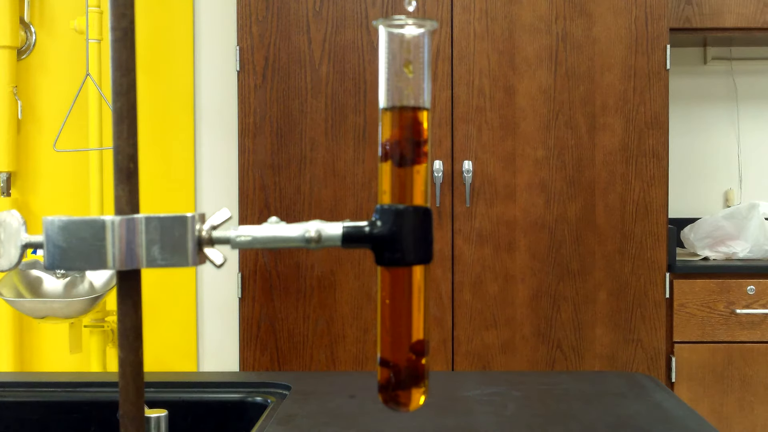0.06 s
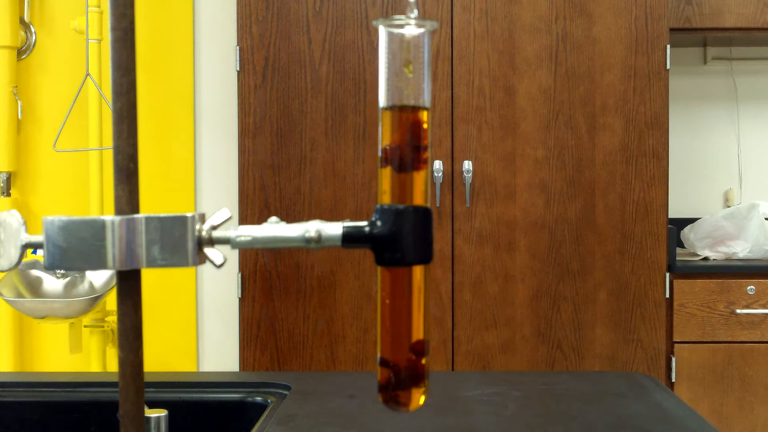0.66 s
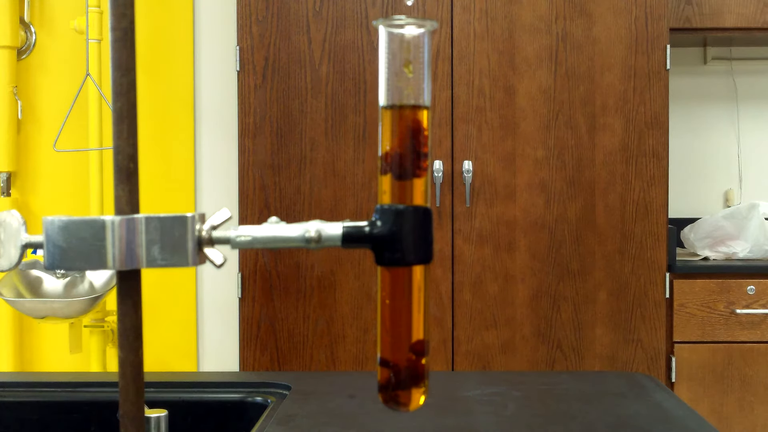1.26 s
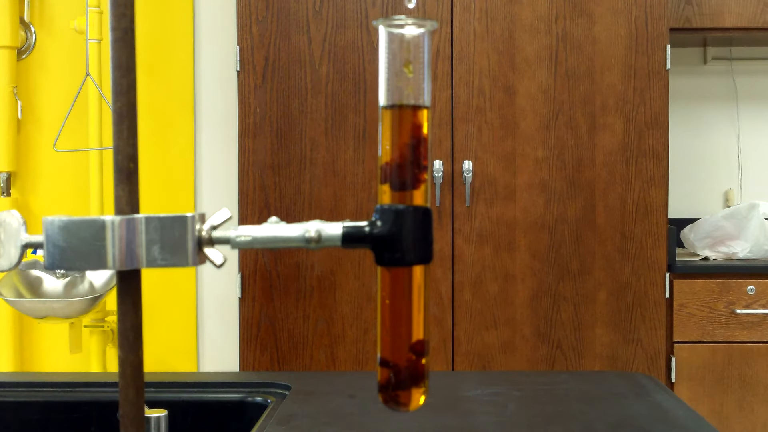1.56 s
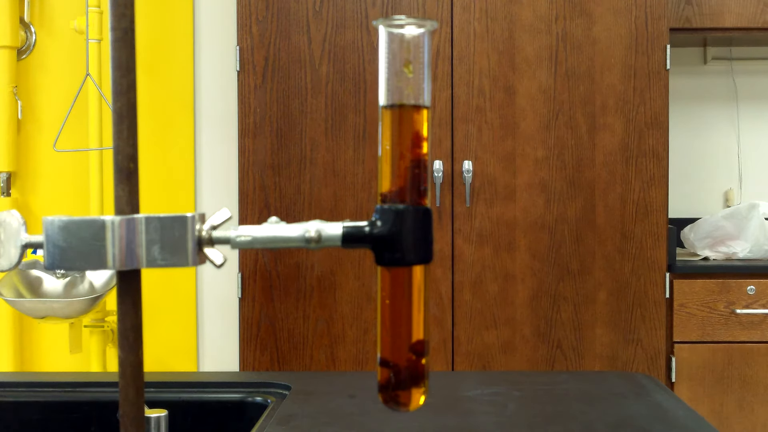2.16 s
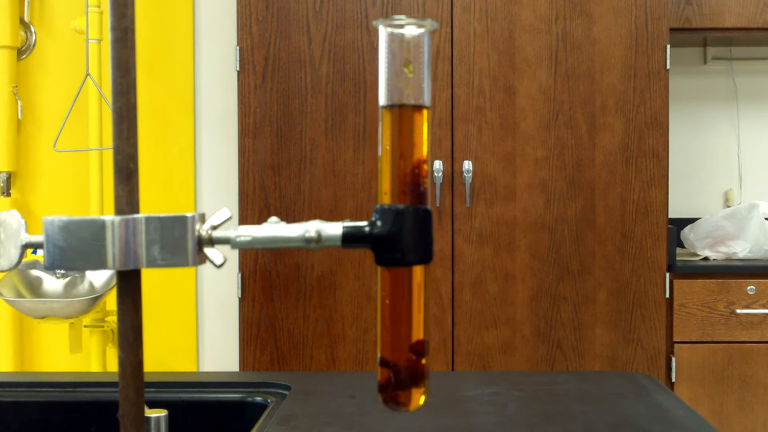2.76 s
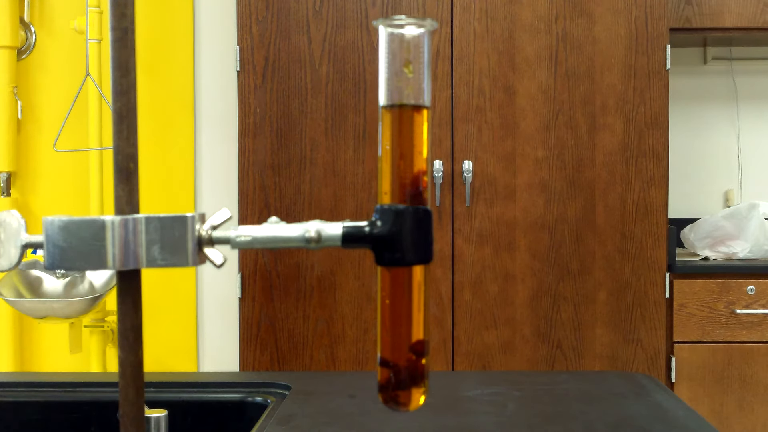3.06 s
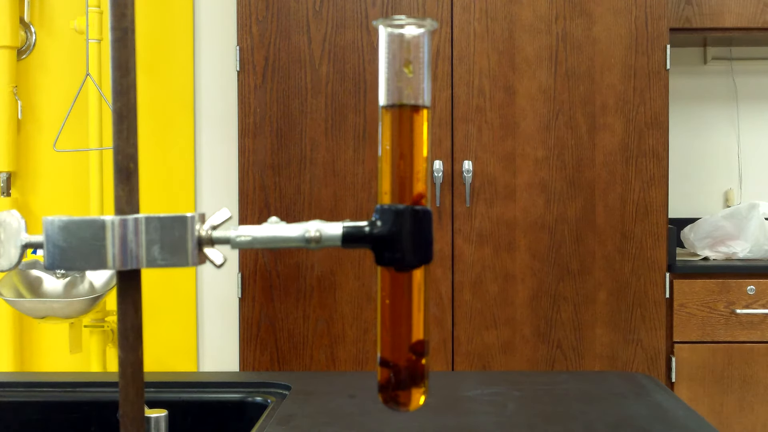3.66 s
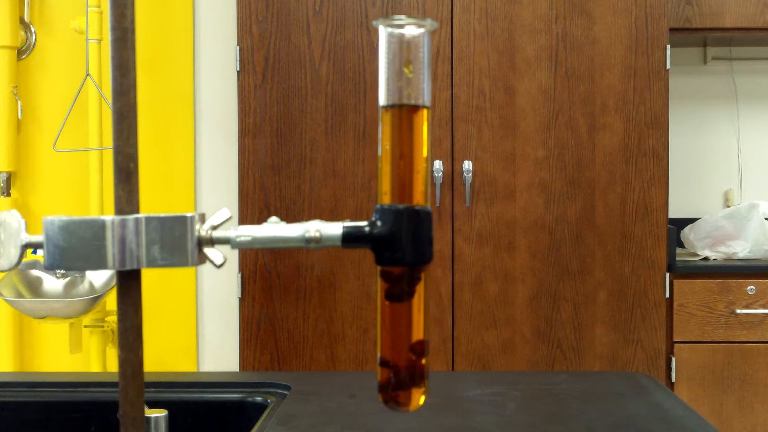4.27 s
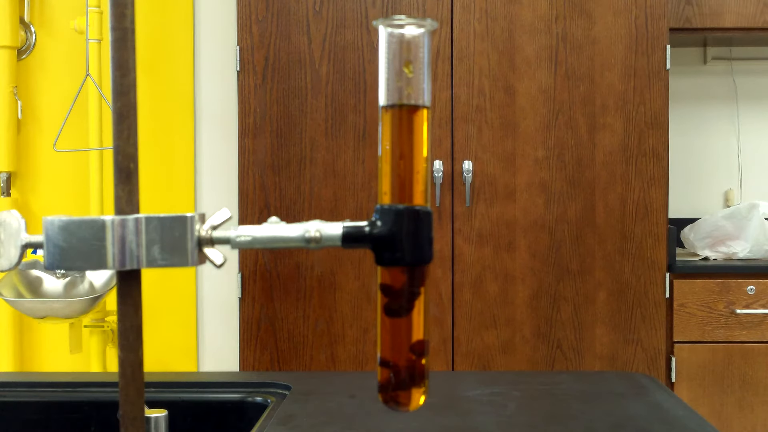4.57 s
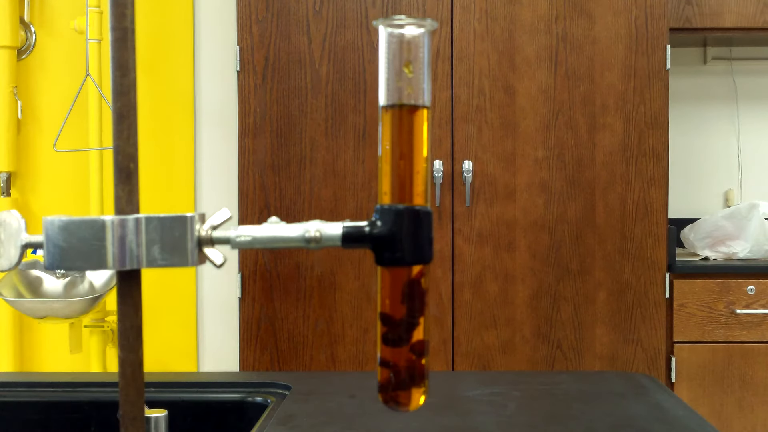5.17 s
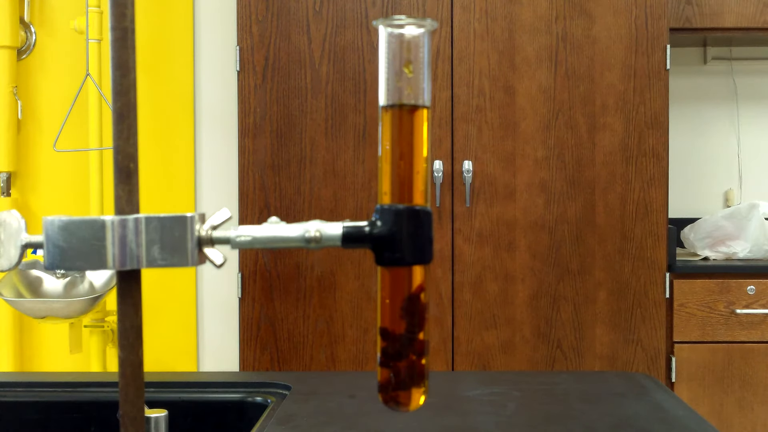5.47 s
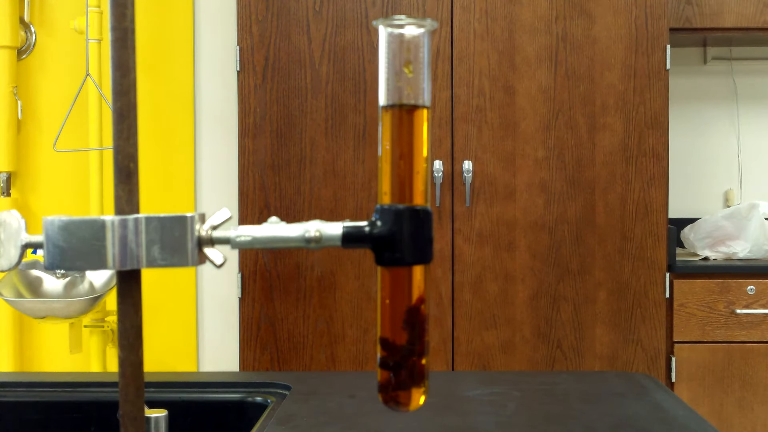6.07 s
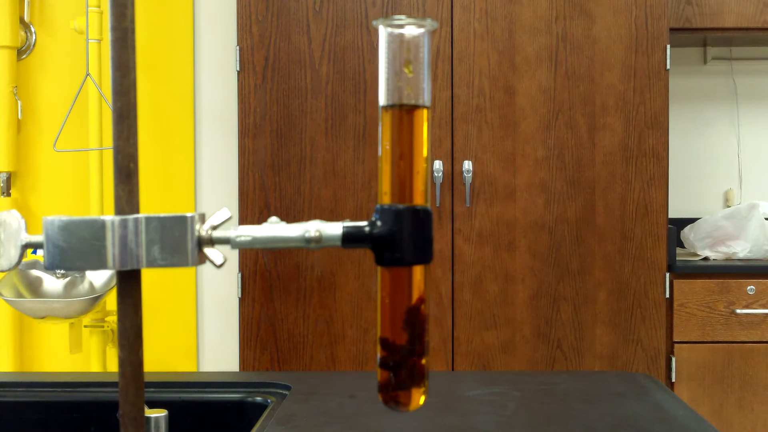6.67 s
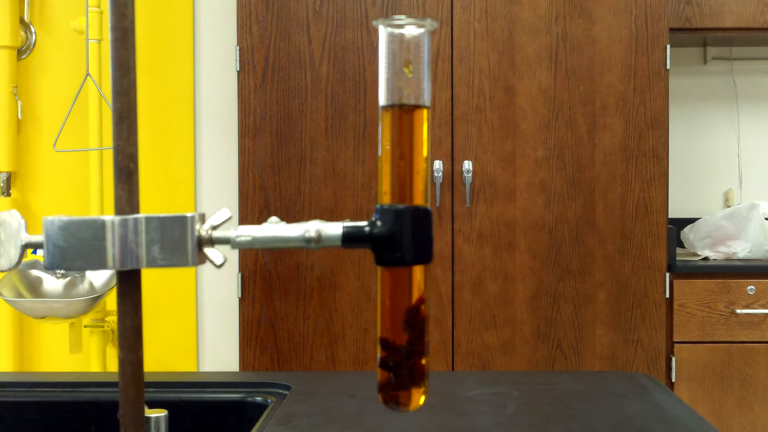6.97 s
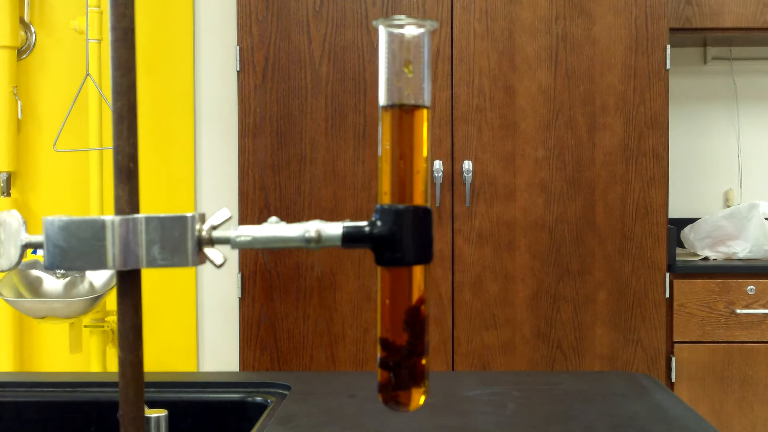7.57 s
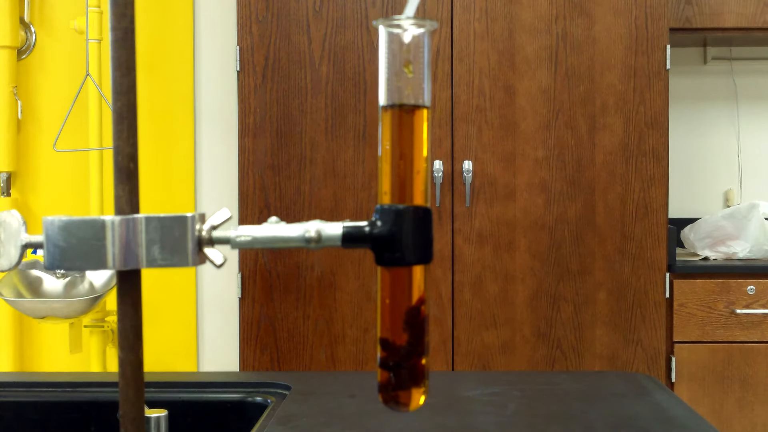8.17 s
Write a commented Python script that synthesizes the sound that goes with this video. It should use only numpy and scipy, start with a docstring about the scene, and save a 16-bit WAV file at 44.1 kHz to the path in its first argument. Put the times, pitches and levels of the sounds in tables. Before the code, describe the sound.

A quiet laboratory's room tone runs for the whole eight and a half seconds: low ventilation rumble, motor hum, soft air hiss and a very faint electronic whine. From about 2.5 seconds a sleeve rustles in faint, grainy strokes, with a few light handling taps around 3.7 to 3.8 seconds and another at 4.5. At 5.2 seconds a faint drip plops into a test tube of liquid. Between 5.7 and 5.9 comes the loudest event, close and nearly dry: two quick hollow plops, a short rising gulp and a weaker third plop, with tiny ringing bubbles and bright ticks of spray. Soft rustling continues until about 7.5 seconds, with faint, thin, very high squeaks around 6.7 to 7.1 and a soft tap at 7.1. One tiny tick follows at 7.7. The handling sounds sit farther back, in a short, dull reverb.

```python
"""First comes the room tone of a quiet laboratory: ventilation rumbles and hisses, motors hum and electronics
whine. A sleeve rustles in grainy strokes, with soft crackles of the cloth and thin squeaks. Then liquid drips,
close up: short hollow plops of an air column, a rising gulp as the dent in the surface closes, tiny ringing
bubbles and light ticks of spray. The walls add a short, dull reverb."""
import sys
import numpy as np
from scipy import signal
from scipy.fft import rfft, irfft, next_fast_len
from scipy.io import wavfile
from scipy.ndimage import map_coordinates

SR = 44100
rng = np.random.default_rng(int(sys.argv[2]) if len(sys.argv) > 2 else 0)


def log_audio(samples):
    """Write samples as a 16-bit WAV file to the path given in sys.argv[1]."""
    # one column per channel
    frames = np.atleast_2d(samples).T
    # limit to full scale, then quantise
    limited = np.clip(frames, -1, 1)
    pcm = np.round(limited * 32767).astype(np.int16)
    wavfile.write(sys.argv[1], SR, pcm)


N = 370881
TIME = np.arange(N) / SR


def amp(db):
    """Decibels as linear gain."""
    return 10 ** (np.asarray(db) / 20)


def unit(x):
    """x at rms 1."""
    return x / np.sqrt(np.mean(x ** 2) + 1e-20)


def wobble(knots_per_s):
    """A smooth random modulator as long as the scene."""
    knots = rng.standard_normal(int(N * knots_per_s / SR) + 4)
    return map_coordinates(knots, [TIME * knots_per_s])


def filtered(x, response):
    """EQ x with a gain curve given as a function of Hz."""
    size = next_fast_len(len(x) + 8192)
    return irfft(rfft(x, size) * response(np.fft.rfftfreq(size, 1 / SR)), size)[:len(x)]


def coloured(spectrum, size):
    """Noise of rms 1, shaped by (freq_hz, gain_db) points on a log frequency axis."""
    points_hz, db = np.transpose(spectrum)
    white = rng.standard_normal(size)
    return unit(filtered(white, lambda hz: amp(np.interp(np.log(hz + 1), np.log(points_hz), db))))


def strike(t, attack_s, t60_s):
    """A percussive envelope: quick rise, exponential decay."""
    return (1 - np.exp(-t / attack_s)) * amp(-60 * t / t60_s)


def add(track, start_s, sound):
    """Mix a sound into the track at start_s."""
    part = track[round(start_s * SR):][:len(sound)]
    part += sound[:len(part)]


def tones(partials, drift_hz, waver_db, knots_per_s):
    """A drone of sines, each wandering a little in pitch and level."""
    out = np.zeros(N)
    for hz, db in partials:
        cycles = rng.random() + np.cumsum(hz + drift_hz * wobble(knots_per_s)) / SR
        waver = amp(waver_db * wobble(knots_per_s))
        out += amp(db) * unit(waver * np.sin(2 * np.pi * cycles))
    return out


# Low end of the ducts: freq_hz, gain_db
DUCT_EQ = [(4, -13), (10, -7), (28, -6), (50, -12), (60, 0), (70, -3.5), (80, -10.5), (91, -11), (106, -5),
           (130, -11), (165, -13), (215, -19), (310, -30), (700, -63)]
# Hiss of moving air: freq_hz, gain_db
AIR_EQ = [(150, -27), (330, -3), (470, 1), (600, -5.5), (730, -3.5), (900, -7), (1300, -8.5), (2200, -12),
          (4000, -14.5), (7000, -16), (8100, -16.5), (9500, -16), (12000, -19), (15800, -19)]
# Fan motor hum: pitch_hz, rms_db
MOTOR_TONES = [(28.5, -47.5), (41, -53), (59.2, -48), (66.5, -47), (119.2, -49), (240, -65.5), (254, -67),
               (271, -72.5), (425, -74.5), (726.7, -77), (958, -78)]

def ventilation():
    """The bed: duct rumble, a smooth rush of air and the hum of fan motors."""
    rumble = amp(-40.5) * coloured(DUCT_EQ, N)
    air = amp(-56.5) * coloured(AIR_EQ, N)
    hum = tones(MOTOR_TONES, drift_hz=0.506, waver_db=3, knots_per_s=3.027)
    return rumble + air + hum


# Whine of the electronics: pitch_hz, rms_db
WHINE_TONES = [(1082, -73), (1200, -75.5), (1561, -79), (4700, -85), (5060, -80), (5303, -86), (8468, -85),
               (8538, -76), (8608, -76), (8678, -86), (9405, -87), (9760, -88)]

def electronics():
    """A thin, nearly steady whine on top of the bed."""
    return tones(WHINE_TONES, drift_hz=0.37, waver_db=1.4, knots_per_s=3.14)


def room(send, t60_s, cutoff_hz, build_s=0.0031):
    """Cupboards and walls answer with a diffuse, dull tail."""
    t = np.arange(SR // 2) / SR
    tail = rng.standard_normal(len(t)) * strike(t, build_s, t60_s)
    wet = signal.fftconvolve(send, tail / np.linalg.norm(tail))[:N]
    return filtered(wet, lambda hz: 1 / np.hypot(1, hz / cutoff_hz))


# Sleeve strokes, each a bell-shaped swell: crest_s, sigma_s, rub_db, swish_db
SLEEVE_STROKES = [(2.62, .2, -75, -66.5), (3.25, 0.38, -74, -67.5), (3.703, 0.016, -61, -60),
                  (3.793, .015, -59, -72), (3.824, 0.02, -56, -52.5), (3.96, 0.15, -63.5, -60.5),
                  (4.467, 0.024, -61, -58), (4.835, .017, -66, -62), (4.968, .016, -61, -58),
                  (5.358, 0.21, -70, -60), (5.657, .042, -64, -57.5), (6.47, 0.043, -70, -59),
                  (6.953, 0.21, -64, -62), (7.314, 0.22, -83, -62.5)]
# Midrange body of the cloth: freq_hz, gain_db
RUB_EQ = [(200, -12), (550, -2), (900, 5.5), (1400, -1), (2600, 1), (3800, -10), (7000, -49)]
# Airy top of the cloth: freq_hz, gain_db
SWISH_EQ = [(1500, 0), (4000, -3), (7000, -0.5), (8200, 1), (9500, 5.5), (11000, -5.5), (13000, -9),
            (16000, -26)]

def sleeve(grain_db=4.0):
    """Cloth rubs and swishes in strokes, grainy as its fibres catch."""
    rub_level, swish_level = np.zeros(N), np.zeros(N)
    for crest_s, sigma_s, rub_db, swish_db in SLEEVE_STROKES:
        swell = np.exp(-.5 * ((TIME - crest_s) / sigma_s) ** 2)
        rub_level += amp(rub_db) * swell
        swish_level += amp(swish_db) * swell
    rub = unit(coloured(RUB_EQ, N) * amp(grain_db * wobble(180)))
    return rub_level * rub + swish_level * coloured(SWISH_EQ, N)


# Sleeve crackles: start_s, level_db, ring_relative_db
SLEEVE_CRACKLES = [(3.699, -51.5, -6), (3.771, -54, -2), (3.782, -47.5, -17), (3.809, -49, -4),
                   (4.456, -49.5, 1), (7.095, -54, -15)]
# Snap of a crackle: freq_hz, gain_db
SNAP_EQ = [(300, -22), (900, -5), (1800, 0), (2700, -1), (3500, -12), (8000, -30)]

def crackles(attack_s=.0008, snap_t60_s=0.059, ring_hz=2546, ring_t60_s=0.1, blur_hz=120):
    """Crackles of the sleeve cloth, each a snap with a short, blurred ring."""
    out, t = np.zeros(N), np.arange(SR // 6) / SR
    for start_s, db, ring_db in SLEEVE_CRACKLES:
        snap = coloured(SNAP_EQ, len(t)) * strike(t, attack_s, snap_t60_s)
        phase = 2 * np.pi * np.cumsum(ring_hz + blur_hz * wobble(210)[:len(t)]) / SR
        ring = amp(ring_db) * np.sin(phase) * strike(t, attack_s, ring_t60_s)
        add(out, start_s, amp(db) * (snap + ring))
    return out


# Thin squeaks: crest_s, half_length_s, crest_pitch_hz, rms_db
SQUEAK_ARCHES = [(3.96, .13, 14200, -74), (6.72, 0.12, 13200, -68), (6.85, 0.074, 14000, -69),
                 (6.848, .17, 11300, -65), (7.06, .08, 9300, -65)]

def squeaks(sag_octaves=.22, jitter=.004, waver=.008, flutter_db=4.0, lower_ratio=0.94, lower_db=-5):
    """A thin pair of unsteady tones arches up and down in pitch and level."""
    out = np.zeros(N)
    for crest_s, half_s, hz, db in SQUEAK_ARCHES:
        position = np.arange(-half_s, half_s, 1 / SR) / half_s  # -1 to 1, crest at 0
        unsteady = (1 + jitter * wobble(393) + waver * wobble(30))[:len(position)]
        pitch_hz = hz * 2 ** (-sag_octaves * position ** 2) * unsteady
        phase = 2 * np.pi * np.cumsum(pitch_hz) / SR
        pair = np.sin(phase) + amp(lower_db) * np.sin(lower_ratio * phase)
        arch = np.sqrt(np.abs(1 - position ** 2))
        flutter = amp(flutter_db * wobble(40)[:len(position)])
        add(out, crest_s - half_s, amp(db) * unit(pair * arch * flutter))
    return out


# Ticks of spray: start_s, level_db, band_centre_hz, band_sigma_octaves, knock_relative_db
SPRAY_TICKS = [(5.7254, -41.5, 9400, 0.25, 7), (5.783, -46, 8600, .25, -5),
               (5.8353, -42.5, 5200, 0.47, -12), (5.875, -49, 7000, .35, -12),
               (5.8849, -35.5, 9500, .1, -7), (7.7064, -52, 10000, .2, -20)]
# Dull knock under a tick: freq_hz, gain_db
KNOCK_EQ = [(100, -8), (400, 3), (1000, -5), (1800, -15), (2700, -10), (4000, -12), (8000, -24),
            (14000, -40)]

def spray(attack_s=0.00027, t60_s=0.029):
    """Each light contact ticks: a bright band of noise over a duller knock."""
    out, t = np.zeros(N), np.arange(SR // 6) / SR
    for start_s, db, centre_hz, octaves, knock_db in SPRAY_TICKS:
        white = rng.standard_normal(len(t))
        bright = filtered(white, lambda hz: np.exp(-.5 * (np.log2((hz + 1) / centre_hz) / octaves) ** 2))
        knock = amp(knock_db) * coloured(KNOCK_EQ, len(t))
        add(out, start_s, amp(db) * (unit(bright) + knock) * strike(t, attack_s, t60_s))
    return out


# Bubble pings: start_s, level_db, overtone_db, pitch_hz, glide_octaves_per_s, t60_s
BUBBLE_PINGS = [(5.7263, -42, -50, 4770, -1.07, .14), (5.7825, -43, -52, 4620, -1, 0.065),
                (5.884, -46.5, -40.5, 4580, -.1, 0.096)]

def bubbles(attack_s=.0006, overtone_ratio=2.15):
    """Tiny bubbles ping with one overtone and bend slightly down in pitch."""
    out, t = np.zeros(N), np.arange(SR // 6) / SR
    for start_s, db, overtone_db, hz, glide, t60_s in BUBBLE_PINGS:
        phase = 2 * np.pi * np.cumsum(hz * 2 ** (glide * t)) / SR
        ping = amp(db) * np.sin(phase) + amp(overtone_db) * np.sin(overtone_ratio * phase)
        add(out, start_s, strike(t, attack_s, t60_s) * ping)
    return out


def gulp(open_s=5.748, crest_s=5.774, closed_s=5.821, start_hz=610, top_hz=2850):
    """The dent in the surface shrinks steadily, so its pitch climbs; ripples shake its level."""
    crest_db, ripple_db = -28.5, 1.6
    swell_db_per_s, fade_db_per_s = 1100, 900
    t = np.arange(open_s, closed_s, 1 / SR)
    dent_size = (closed_s - t) / (closed_s - open_s)
    pitch_hz = np.minimum(start_hz / dent_size, top_hz)
    level_db = crest_db + np.minimum(swell_db_per_s * (t - crest_s), fade_db_per_s * (crest_s - t))
    level_db += ripple_db * wobble(407)[:len(t)]
    out = np.zeros(N)
    add(out, open_s, amp(level_db) * np.sin(2 * np.pi * np.cumsum(pitch_hz) / SR))
    return out


# Hollow plops of the air column: start_s, peak_db, pitch_hz
DRIP_PLOPS = [(5.2132, -35, 950), (5.7254, -23, 910), (5.777, -16, 948), (5.8825, -38.5, 920)]

def plops(rise_s=.0034, t60_s=.024, ring_hz=965, ring_relative_db=-28, ring_t60_s=.12):
    """The air column swells for a few cycles, dies quickly and leaves a faint ring in the tube."""
    out, t = np.zeros(N), np.arange(SR // 6) / SR
    envelope = (1 - np.exp(-(t / rise_s) ** 2)) * amp(-60 * t / t60_s)
    envelope /= envelope.max()
    ring = amp(ring_relative_db) * strike(t, rise_s, ring_t60_s) * np.sin(2 * np.pi * ring_hz * t)
    for start_s, db, hz in DRIP_PLOPS:
        body = envelope * np.sin(2 * np.pi * hz * t)
        add(out, start_s, amp(db) * (body + ring))
    return out


def scene():
    """The mono mix: drips close and nearly dry, handling farther back with more reverb."""
    drips = plops() + gulp() + bubbles() + spray()
    handling = sleeve() + crackles() + squeaks()
    send = amp(-16.5) * drips + amp(-5) * handling
    reverb = room(send, t60_s=0.32, cutoff_hz=4000)
    return (drips + handling + reverb + ventilation() + electronics())[None]


def record(dry):
    """A brick-wall low-pass on the whole mix."""
    cutoff_hz = 15850
    return np.array([filtered(channel, lambda hz: hz < cutoff_hz) for channel in dry])


dry = scene()
out = record(dry)
log_audio(out)
```